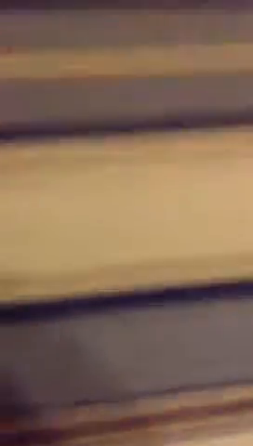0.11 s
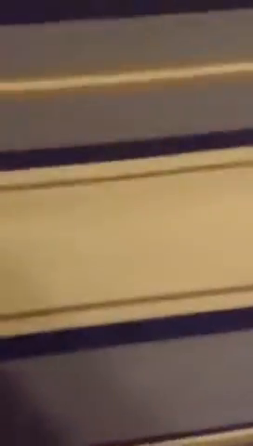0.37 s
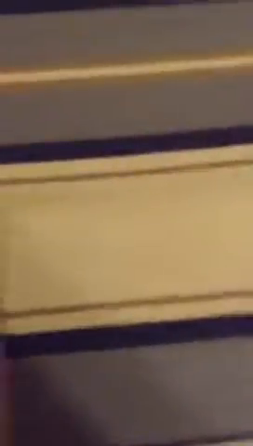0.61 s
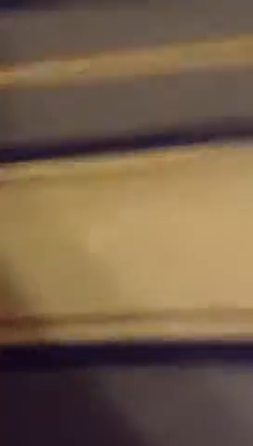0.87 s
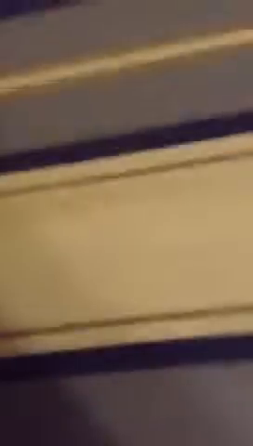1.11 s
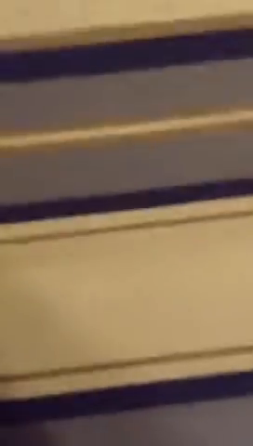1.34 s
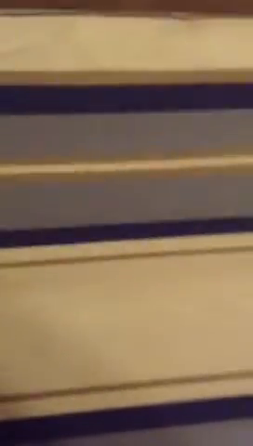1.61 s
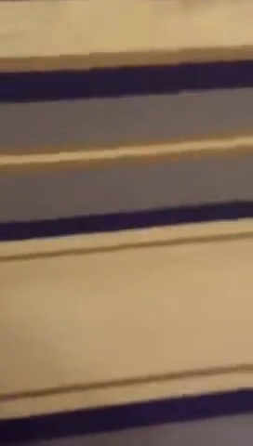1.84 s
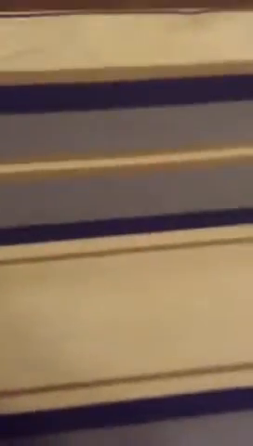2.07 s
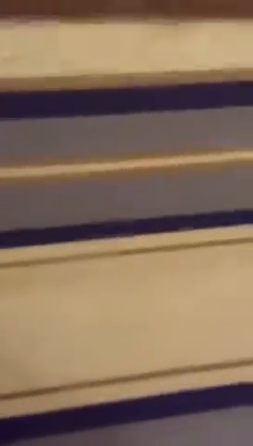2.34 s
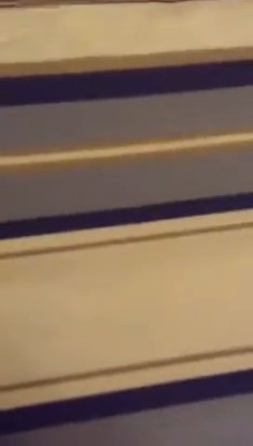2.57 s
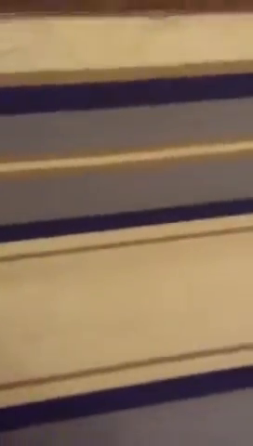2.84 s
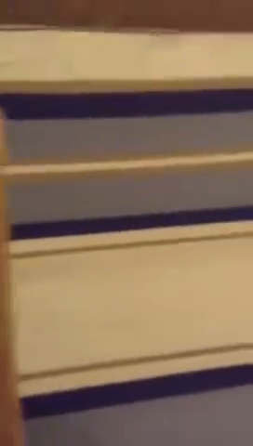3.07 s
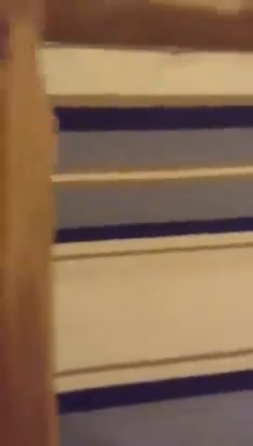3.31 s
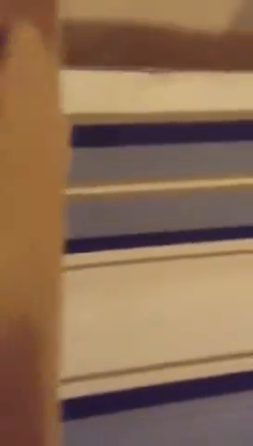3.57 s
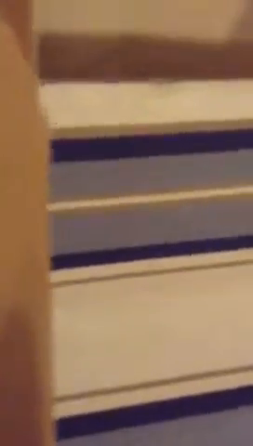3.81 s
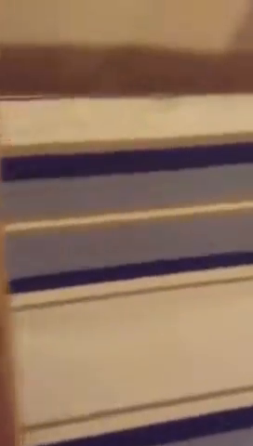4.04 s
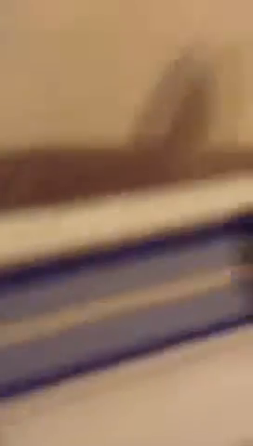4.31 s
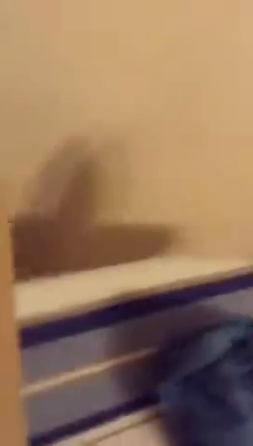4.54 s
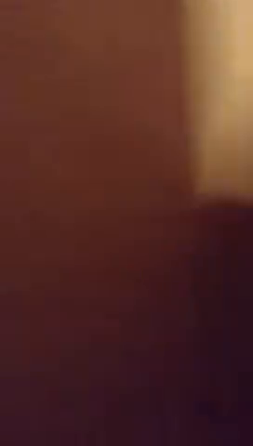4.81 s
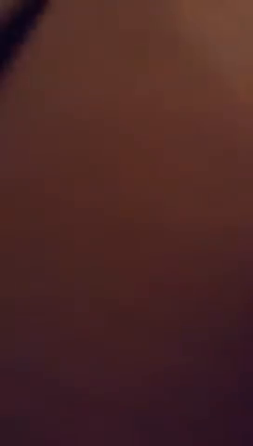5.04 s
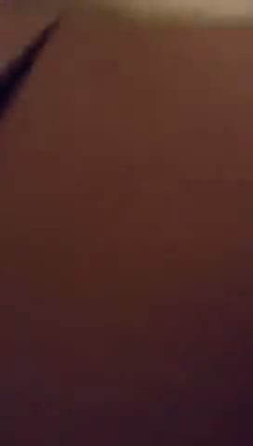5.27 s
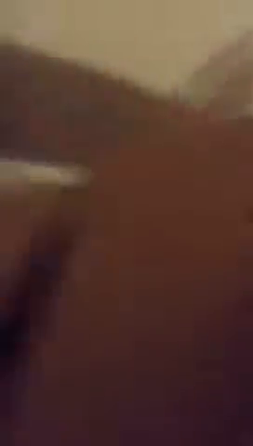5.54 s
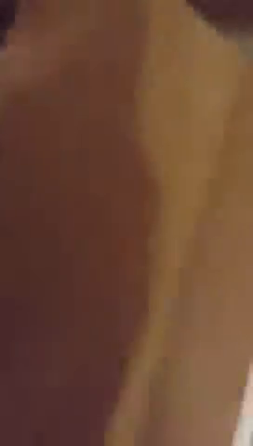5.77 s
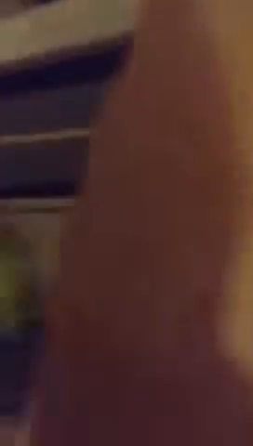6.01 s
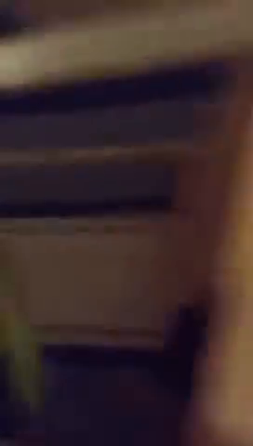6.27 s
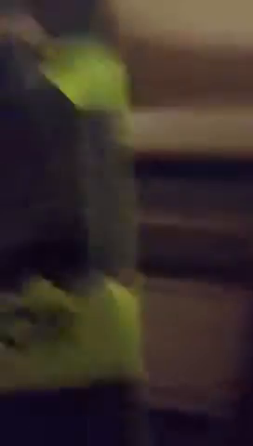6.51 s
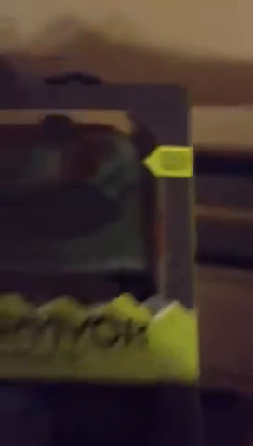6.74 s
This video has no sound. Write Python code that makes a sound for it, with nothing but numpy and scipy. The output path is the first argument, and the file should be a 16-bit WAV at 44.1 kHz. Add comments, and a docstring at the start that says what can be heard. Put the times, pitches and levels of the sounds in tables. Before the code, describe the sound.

Very close to a phone microphone in a small room, hands scrape and turn a hollow cardboard package with plastic film. A bright tear around one second ends in a hard snap, another strong crack follows near two, then lighter crinkles and taps. Busy hollow knocks and snaps return after four seconds, with a brief creak, before thumps near six give way to quiet.

```python
"""Hands rub, tear and turn a hollow cardboard box with plastic wrap, right by a phone microphone in a small room.
Rubbing is a dense stream of tiny slips: the walls rumble, the card scrapes and the film hisses.
A long tear sings in a narrow band; creases snap, seams rip and a bent flap creaks, all as close by.
Fingers knock the box, which rings in its low modes, and low jolts come through the hands.
Behind them lie the short reflections of the room, its quiet air and the microphone's own noise."""
import sys
import numpy as np
from scipy import signal
from scipy.io import wavfile
from scipy.ndimage import uniform_filter1d

SR = 44100
rng = np.random.default_rng(int(sys.argv[2]) if len(sys.argv) > 2 else 0)


def transcribe(signal):
    """Save signal, clipped to [-1, 1], as a 16-bit WAV file at the path in sys.argv[1]."""
    frames = np.atleast_2d(signal).T
    limited = np.clip(frames, -1, 1)
    pcm = np.round(limited * 32767).astype(np.int16)
    wavfile.write(sys.argv[1], SR, pcm)


def level_to_linear(level):
    """Convert decibel levels to linear amplitude factors, elementwise."""
    exponent = np.asarray(level, float) / 20
    return 10 ** exponent


N = 303408  # samples

# strokes of the hand, close to the microphone: start_s, length_s, effort_db,
# wall_pressure_db and film_share_db (both relative to the effort)
STROKES = [(0.013, 0.13, -39, -16.5, 1.4), (0.06, 0.01, -42.5, 7.5, -11), (0.098, 0.019, -30, -10, -10.8),
           (0.11, 0.25, -40, -10, 4), (0.297, 0.015, -38, -1, 2), (0.349, 0.064, -40.5, -8.5, 5),
           (0.5, 0.075, -48, -7, -0.5), (0.575, 0.066, -39.5, -6, 4.5), (0.631, 0.019, -33, -5, 1),
           (0.751, 0.045, -43.5, 6.5, -3.8), (0.822, 0.065, -31.5, 1.3, -0.5), (0.855, 0.17, -28, -10, 3),
           (1.054, 0.017, -23, -16.2, 8), (1.047, 0.066, -23.5, -4.5, -4.5),
           (1.174, 0.1, -50.5, -2.4, -3.3), (1.226, 0.26, -40, -11, -2.5), (1.323, 0.077, -37, -1, -20),
           (1.439, 0.0059, -33.5, 1, -4.5), (1.474, 0.12, -47.1, 6, -6), (1.546, 0.081, -39, -6.5, -2.5),
           (1.636, 0.092, -39.5, -9, -8.5), (1.792, 0.13, -39, -0.5, -8), (1.81, 0.004, -28.5, -13, -2.5),
           (1.861, 0.011, -32, 10.5, -3), (1.91, 0.29, -48, 0.4, -4.5), (1.921, 0.038, -46, 13, -8),
           (2.14, 0.24, -49.5, -1.5, 0.5), (2.288, 0.011, -44.0, 6.5, 5), (2.336, 0.035, -44, -17, 0.5),
           (2.464, 0.051, -47, -5, 1.5), (2.562, 0.034, -43, 6, -3.5), (2.633, 0.0035, -34, -10.1, 0.7),
           (2.638, 0.23, -50, -22.5, -1.5), (2.691, 0.015, -39.5, -4.5, -20), (2.854, 0.041, -46, 4, -13),
           (2.977, 0.075, -48, 0, 1.8), (3.032, 0.25, -48, 3.5, -1.9), (3.066, 0.0073, -39.5, 6, -12),
           (3.209, 0.046, -41, -2, -1), (3.31, 0.1, -48, -14, 4), (3.356, 0.18, -44, 4, 3),
           (3.45, 0.19, -49.5, 3.5, 6), (3.674, 0.13, -41, -6, -0.5), (3.716, 0.0086, -34, -0.5, -4),
           (3.827, 0.01, -28, -16, -16), (3.918, 0.092, -39.5, 0.5, -3.5), (4, 0.018, -43.5, -13.1, 8),
           (4.1, 0.15, -53.2, -23, 13), (4.108, 0.012, -38.5, 1.1, -16), (4.213, 0.16, -41, -1, 1.1),
           (4.27, 0.23, -40.5, -2, 0.5), (4.277, 0.06, -29.5, -3.2, -3.5), (4.484, 0.11, -37, 4.5, -2),
           (4.575, 0.15, -50.5, 9.5, 5.5), (4.663, 0.037, -57, 24.5, 16.5), (4.707, 0.017, -36, -10, 0.9),
           (4.735, 0.06, -41.5, -14, 9.5), (4.821, 0.0028, -39.5, 7, -1), (4.857, 0.074, -48, 2, 0.5),
           (4.981, 0.239, -41, -1.5, -5.5), (4.986, 0.0038, -40.5, 2, 8.5),
           (5.278, 0.015, -49.5, 5.5, -22.1), (5.323, 0.084, -52.5, 5.5, 6), (5.403, 0.21, -47, 4.5, 1.5),
           (5.441, 0.02, -46, -12, 4), (5.552, 0.22, -40, -3, -1.8), (5.572, 0.12, -36.5, -24, 1.5),
           (5.799, 0.015, -45, 11.5, 10), (5.857, 0.13, -44.5, 1, -4), (5.866, 0.0037, -32, -16, -5),
           (5.937, 0.022, -40, 10, 1), (6.029, 0.057, -52, -2, -5.7), (6.155, 0.1, -62.5, 1, -13),
           (6.165, 0.005, -57, 5, -5), (6.207, 0.005, -76, 29, -5.3), (6.546, 0.066, -64, -19, -7),
           (6.657, 0.14, -67.5, -16, -6), (6.698, 0.088, -63.5, -17, -5)]
STROKE_RISE_DB_S, CARD_FALL_DB_S, WALL_FALL_DB_S, FILM_FALL_DB_S = 702.5, 450.5, 302, 498.5


def rubbing():
    """Each stroke drives slips on the walls, the card and the film, over the steadier shifting of the hold."""
    start_s, length_s, effort_db, wall_db, film_db = np.transpose(STROKES)
    hold_db, bright = holding(column=1), holding(column=2)
    wall_rows = zip(start_s, length_s, effort_db + wall_db)
    card_rows = zip(start_s, length_s, effort_db)
    film_rows = zip(start_s, length_s, effort_db + film_db)
    wall_gain = swells(wall_rows, STROKE_RISE_DB_S, WALL_FALL_DB_S, hold_db - 7.5)
    card_gain = swells(card_rows, STROKE_RISE_DB_S, CARD_FALL_DB_S, hold_db)
    # a brighter film is also louder under the hold
    film_gain = swells(film_rows, STROKE_RISE_DB_S, FILM_FALL_DB_S, hold_db - 4 + 0.94 * bright)
    return wall_gain * wall_rumble() + card_gain * card_scrape() + film_gain * film_hiss(bright)


# the hands keep shifting on the box: time_s, effort_db, brightness_db_per_octave as the film turns,
# pitch_hz (resonance of the rubbed card)
HOLD = [(0, -42.5, 0, 2606), (.4, -43.5, -2, 3600), (.46, -53.5, 3, 2000), (0.621, -44, -3, 3160),
        (.8, -39.5, 4, 1857), (1.2, -49, 0.5, 2983), (1.4, -48, 1.5, 3086), (1.55, -48.5, 2, 1920),
        (1.75, -46, 2, 2500), (2.0, -51, -3, 2400), (2.43, -54, 5.5, 1700), (2.7, -50, 4, 1298),
        (3.3, -46.5, 7, 1288), (3.9, -50.5, 4, 1590), (4.2, -45.5, 3, 3500), (4.3, -41, 1.5, 1600),
        (4.6, -46, 6.5, 1290), (4.95, -51.5, -2, 1614), (5.1, -43, 1, 1687), (5.35, -49.5, -1, 2700),
        (5.5, -45.5, -9, 1600), (5.571, -46, -6, 2780), (5.75, -50, -3, 3590), (5.9, -60, 3.5, 1598),
        (6.02, -61, 0, 2200), (6.13, -65, -7, 2000), (6.3, -88, 1.5, 2990), (6.5, -82, -1, 3470),
        (6.651, -75, -10.5, 2673), (6.88, -68, -10, 3275)]


def holding(column):
    """One property of the hold, gliding from row to row as the hands shift."""
    table = np.array(HOLD)
    return np.interp(np.arange(N) / SR, table[:, 0], table[:, column])


# colour of the shaken walls: frequency_hz, level_db (per Hz, relative)
RUMBLE = [(82, -33), (140, -6.5), (183, -15.5), (264, 9.5), (303, -2.5), (356, -9.5), (519, -2.5),
          (642, -0.5), (1400, -21), (1820, -42.5), (3080, -120)]


def wall_rumble():
    """Slips shake the walls and their modes; the rumble's pitch glides between those of the spots knocked."""
    knocked = np.transpose(KNOCKS)

    def colour_db(hz, t):
        return read(RUMBLE, hz) + 7 * hump(hz, np.interp(t, knocked[0], knocked[2]), octaves=0.45)

    walls = coloured(slips(4000, spread_db=1.5, clump_db=1.5), colour_db, patchy_db=2)
    ringing = signal.oaconvolve(slips(2000, spread_db=1.5, clump_db=1.5), box_ring(spot_hz=400, reach=4))[:N]
    return evened(walls + 0.37 * evened(ringing))


# colour of the scraped card: frequency_hz, level_db (per Hz, relative)
SCRAPE = [(80, -60.5), (300, -4.5), (800, 0), (1300, -3), (2000, -3), (2800, -3), (3600, -6), (4300, -11),
          (7000, -16.5), (15000, -57.5)]


def card_scrape():
    """Dense slips scrape and sparse ones tick on the card, setting the box's modes ringing."""
    held = np.transpose(HOLD)

    def colour_db(hz, t):
        return read(SCRAPE, hz) + 6 * hump(hz, np.interp(t, held[0], held[3]), octaves=0.2)

    dense = slips(12000, spread_db=1.5, clump_db=1.5)
    ticks = slips(250, spread_db=2.5, clump_db=3)
    scrape = evened(dense) + 0.35 * evened(ticks)
    ringing = signal.oaconvolve(scrape, box_ring(spot_hz=2000, reach=11))[:N]
    return evened(coloured(scrape, colour_db, patchy_db=2.6) + 0.42 * evened(ringing))


# colour of the plastic film: frequency_hz, level_db (per Hz, relative)
HISS = [(500, -63), (2500, -6), (5000, 2.5), (6500, 1.5), (8500, 2.5), (11000, -2), (13500, -1),
        (15500, -7.5)]


def film_hiss(bright):
    """Very dense slips and a few ticks hiss on the film, tilting brighter or duller around 9 kHz as it turns."""
    def colour_db(hz, t):
        tilt = np.interp(t * SR, np.arange(N), bright)
        return read(HISS, hz) + tilt * np.log2(np.maximum(hz, 5000) / 9000)

    dense = slips(20000, spread_db=1.5, clump_db=1.2)
    ticks = slips(200, spread_db=2.5, clump_db=3)
    return coloured(evened(dense) + 0.22 * evened(ticks), colour_db, patchy_db=2.5)


# the long tear, close by: time_s, level_db, pitch_hz (centre of its band)
TEAR = [(0.8, -45, 3400), (0.836, -33.5, 3300), (0.926, -24.5, 3770), (0.948, -29.5, 3670),
        (1.014, -22, 3770), (1.018, -25.5, 3720), (1.066, -29.5, 3115), (1.1, -37, 3275)]


def tear():
    """Fibres part at a steady pace and the slit between the flaps picks out one gliding band."""
    s, level_db, slit_hz = np.transpose(TEAR)

    def slit_db(hz, t):
        return -40 * (1 - hump(hz, np.interp(t, s, slit_hz), octaves=0.55))

    fibres = coloured(slips(6600, spread_db=-1.5, clump_db=2), slit_db, patchy_db=0)
    return level_to_linear(np.interp(np.arange(N) / SR, s, level_db, left=-120, right=-120)) * fibres


# snaps of fibre and film, close by: start_s, level_db (dull part), treble_db, pitch_hz
SNAPS = [(.0464, -29.5, -27, 3160), (0.1457, -29.5, -30.5, 1940), (0.1846, -36, -45, 1280),
         (.233, -25.5, -29, 3140), (.6888, -33.5, -41, 3970), (.7133, -30.5, -56.5, 1710),
         (.7692, -33, -36.5, 1870), (0.8534, -22.5, -26.5, 1920), (1.0798, -3.5, -10, 2150),
         (1.1112, -11.5, -12, 1950), (1.1842, -31.5, -47, 1010), (1.251, -21.5, -30.5, 1680),
         (1.35, -30.5, -40, 1800), (1.4321, -16, -27.5, 2100), (1.476, -29, -39, 1820),
         (1.546, -23, -35, 1800), (1.605, -25, -38, 1860), (1.6463, -33.5, -34.5, 1850),
         (1.8524, -4, -12.5, 1900), (1.9738, -31, -51, 1120), (2.139, -28.5, -47, 1110),
         (2.224, -50, -31.5, 1850), (2.2637, -50, -36.5, 2510), (2.2877, -34.5, -32.5, 2340),
         (2.4067, -40, -47, 1530), (2.4527, -40.5, -44, 1830), (2.577, -37.5, -36, 1380),
         (2.6033, -38, -31.5, 1250), (2.6338, -22, -26, 5030), (2.688, -30.5, -46, 1460),
         (2.7677, -31.5, -43, 1330), (2.8087, -36.5, -51, 1360), (2.8527, -33, -48, 1300),
         (2.884, -34.5, -44.5, 1080), (3.0693, -27.5, -28, 1200), (3.0919, -28, -44.5, 1380),
         (3.1737, -33, -35, 1200), (3.247, -32, -41.5, 1120), (3.352, -40, -30.5, 1800),
         (3.385, -36, -30.5, 3360), (3.485, -34.5, -35, 1830), (3.592, -36, -34.5, 4400),
         (3.6106, -35, -34.5, 2030), (3.6955, -29, -36.5, 2460), (3.7102, -19.5, -28, 1520),
         (3.729, -32.5, -25.5, 1340), (3.8367, -23.5, -45, 2540), (3.922, -27, -35, 1560),
         (3.9648, -27, -39, 2000), (3.998, -34, -34.5, 1540), (4.0158, -19, -21, 1790),
         (4.0945, -37, -46, 4320), (4.1144, -24, -43.5, 1180), (4.2803, -10, -35, 1980),
         (4.324, -9, -32, 1520), (4.388, -25.5, -37.5, 1290), (4.4895, -6.5, -10.5, 1540),
         (4.5348, -23, -32.5, 1410), (4.5684, -23, -36, 2180), (4.6445, -29, -29, 1280),
         (4.663, -43, -26.5, 1250), (4.816, -26, -33.5, 1170), (4.983, -25.5, -27, 3920),
         (5.044, -30, -32.5, 1220), (5.0897, -25, -29, 1540), (5.1178, -30, -36, 1720),
         (5.1974, -29, -32.5, 1660), (5.2687, -33, -40, 1700), (5.3286, -36, -37, 2750),
         (5.398, -33, -44, 1020), (5.4759, -29, -47, 1000), (5.5884, -27, -34.5, 2760),
         (5.7502, -24.5, -32, 1090), (5.7662, -33, -25.5, 1070), (5.798, -38, -27, 3100),
         (5.8082, -28.5, -31, 4120), (5.9207, -28.5, -36, 1080), (5.9487, -30, -28, 2770),
         (6.157, -34.5, -57, 2040), (6.6897, -52, -63, 1116), (6.7433, -50, -66, 1650)]
SNAP_RISE_S, SOFT_DECAY_S, HARD_DECAY_S, SOFT_DB = 0.0014, 0.0039, 0.0014, -34.5


def snaps():
    """Each snap builds up as the crease gives, then dies in a few milliseconds, faster the harder it is."""
    out, t = np.zeros(N), np.arange(SR // 10) / SR
    noise = rng.standard_normal((len(SNAPS), 2, len(t)))
    for (s, level_db, treble_db, hz), cracks in zip(SNAPS, noise):
        softness = min(max(level_db, treble_db) / SOFT_DB, 1)
        decay_s = HARD_DECAY_S + (SOFT_DECAY_S - HARD_DECAY_S) * softness
        burst = np.minimum(t / SNAP_RISE_S, 1) * np.exp(-np.maximum(t - SNAP_RISE_S, 0) / decay_s)
        add(out, s, burst * crackle(cracks, level_db, treble_db, hz))
    return out


# short rips of glued card, close by: start_s, length_s, level_db (dull part), treble_db, pitch_hz
RIPS = [(0.1117, 0.0045, -22, -28.5, 2070), (0.817, 0.042, -32.5, -39, 1900),
        (1.061, 0.015, -30, -25.5, 2200), (1.103, 0.016, -30, -31.5, 2000),
        (1.429, 0.015, -30.5, -37, 1960), (1.798, 0.015, -22.5, -34, 2400),
        (2.6213, 0.0046, -23, -25.5, 1880), (3.664, 0.011, -31, -50, 1340),
        (3.718, 0.0057, -17.5, -22.5, 1420), (3.806, 0.033, -35.5, -45, 2510),
        (4.276, 0.011, -24.5, -31, 1880), (4.568, 0.011, -26.5, -37, 2170), (4.71, 0.021, -35, -35.5, 1120),
        (5.694, 0.018, -29, -34.5, 1760), (5.856, 0.015, -27, -36.5, 1510)]


def rips():
    """A seam gives way: crackle swells fast, holds unevenly while the hand pulls and stops short."""
    out, t = np.zeros(N), np.arange(SR // 10) / SR
    noise = rng.standard_normal((len(RIPS), 3, len(t)))
    for (s, length_s, *colour), (*cracks, jerks) in zip(RIPS, noise):
        pull = np.minimum(t / 0.0016, 1) * np.exp(-np.maximum(t - length_s, 0) / 0.0023)
        uneven = level_to_linear(1.9 * evened(uniform_filter1d(jerks, size=90)))
        add(out, s, pull * uneven * crackle(cracks, *colour))
    return out


def crackle(cracks, level_db, treble_db, hz):
    """Breaking fibres: a dull part around a pitch and a bright spit."""
    dull, spit = cracks
    broad = band(band(dull, 600, 3000), 380, 7200)
    pitched = band(dull, hz * 0.9, hz * 1.05)
    body = evened(broad) + 1.1 * evened(pitched)
    return level_to_linear(level_db) * evened(body) + level_to_linear(treble_db) * evened(band(spit, 4200, 14000))


# knocks on the box, close by: start_s, level_db, pitch_hz (of the struck spot),
# ring_db (relative to the push), push_s (its decay, at least 2 ms)
KNOCKS = [(0.111, -19.5, 554, -3.5, 0.0093), (0.145, -19, 400, -24, 0.0049), (0.186, -21, 560, -18, 0.0088),
          (0.414, -35, 660, -20, 0.011), (0.558, -33.5, 738, -10, 0.018), (0.638, -25, 345, -12.5, 0.019),
          (0.768, -37, 356, 5.5, 0.011), (0.82, -22.5, 530, -1.5, 0.013), (0.85, -29.5, 670, -0.5, 0.0047),
          (1.02, -31, 355, 6, 0.011), (1.078, -14.5, 780, 0.5, 0.0052), (1.115, -17, 424, -8, 0.0059),
          (1.182, -18.5, 278, -30, 0.0037), (1.245, -27.5, 712, -1.5, 0.015), (1.325, -37, 316, -5, 0.013),
          (1.448, -25.5, 547, -10.5, 0.006), (1.544, -16.5, 677, -11.5, 0.0049),
          (1.606, -29.5, 400, -1.5, 0.0053), (1.8, -27, 167, -3, 0.01), (1.851, -10, 341, -3.5, 0.011),
          (2.063, -27.5, 348, -5, 0.011), (2.096, -36, 171, -18, 0.02), (2.139, -21, 202, -7.5, 0.0059),
          (2.242, -27, 584, -12, 0.012), (2.288, -19, 424, -9.5, 0.0049), (2.38, -29, 348, -23, 0.0093),
          (2.46, -38.5, 280, -1.5, 0.0067), (2.577, -26, 280, -11, 0.0086),
          (2.619, -22.5, 338, -29, 0.0068), (2.69, -43, 260, 0, 0.011), (2.852, -34.5, 593, -0.5, 0.0091),
          (2.884, -38, 577, -5, 0.011), (2.961, -31, 384, -14, 0.011), (2.994, -28.5, 258, -3, 0.0072),
          (3.065, -23, 262, -7, 0.0094), (3.088, -23, 265, -3.5, 0.0073), (3.239, -34.5, 367, 3, 0.032),
          (3.388, -37, 202, 5, 0.014), (3.489, -20.5, 270, -6, 0.0028), (3.607, -32, 149, 2, 0.0087),
          (3.667, -23, 730, -35, 0.012), (3.695, -22, 502, -21, 0.0067), (3.734, -36, 285, -16, 0.0072),
          (3.8, -29.5, 702, -0.5, 0.02), (3.833, -23.5, 450, -30, 0.0067), (3.918, -40, 192, 0, 0.016),
          (3.965, -18, 280, -27, 0.0058), (4.016, -27, 285, -23, 0.01), (4.073, -33, 312, -3.5, 0.008),
          (4.117, -26, 339, -11, 0.015), (4.207, -33, 573, -18.5, 0.0092), (4.279, -16, 625, -5.5, 0.0063),
          (4.325, -15, 388, -3.5, 0.006), (4.391, -12, 300, -35.5, 0.007),
          (4.488, -24.5, 568, -32.5, 0.013), (4.538, -18, 400, -20, 0.0053),
          (4.573, -20.5, 561, -2.5, 0.016), (4.583, -33, 426, -39.5, 0.0071), (4.645, -31, 388, -4, 0.024),
          (4.701, -22, 378, -31, 0.0082), (4.713, -11, 261, -20, 0.0074), (4.818, -13.5, 423, -29, 0.011),
          (4.988, -29, 670, -0.5, 0.011), (4.998, -26, 132, -7, 0.0039), (5.046, -23.5, 403, -21, 0.0059),
          (5.092, -27.5, 625, -5, 0.0086), (5.113, -27.5, 252, -7, 0.012), (5.196, -27, 596, -10, 0.0085),
          (5.23, -23.5, 395, -17, 0.0045), (5.285, -28.5, 747, -6.5, 0.0057),
          (5.325, -26, 517, -11.5, 0.0034), (5.396, -24, 885, -31, 0.0083), (5.46, -35, 830, 3, 0.017),
          (5.498, -22, 870, -16, 0.0054), (5.699, -24, 680, -0.5, 0.0095), (5.776, -35, 147, -19, 0.0087),
          (5.811, -26, 400, -6.5, 0.019), (5.86, -28.5, 280, 1.5, 0.0092), (5.904, -10.5, 598, -8, 0.01),
          (5.924, -19, 660, -12, 0.0097), (5.936, -8.5, 273, -12.5, 0.0049),
          (6.159, -23, 400, -8.5, 0.0066)]


def knocks():
    """A finger pushes the wall in, a dying swing at the spot's pitch, and the box rings with it."""
    out, t = np.zeros(N), np.arange(SR // 2) / SR
    for s, level_db, hz, ring_db, push_s in KNOCKS:
        push = np.sin(2 * np.pi * hz * t) * np.exp(-t / max(push_s, 0.002))
        onset = np.minimum(t / 0.0019, 1)
        add(out, s, level_to_linear(level_db) * onset * (push + level_to_linear(ring_db) * box_ring(hz, reach=6.5)))
    return out


# modes of the hollow box: pitch_hz, level_db (before the struck spot's weighting), t60_s
BOX = [(162, -15.5, 0.04), (208, -21.5, 0.12), (280, -6, 0.31), (366, -1, 0.16), (424, 2.5, 0.057),
       (496.5, 2.5, 0.054), (647.3, 4, 0.064), (789, 2, 0.041), (962, 1.5, 0.029), (1336, -11, 0.092),
       (1500, -10, 0.036), (1760, -6.5, 0.048), (1950, -7, 0.047), (2100, -11, .12), (2400, -18, 0.14),
       (2770, -8, 0.08)]


def box_ring(spot_hz, reach):
    """Decaying box modes; each loses reach dB per octave away from the struck spot's pitch."""
    t = np.arange(SR // 2) / SR
    ring = np.zeros(len(t))
    for hz, level_db, t60_s in BOX:
        fading_db = level_db - reach * abs(np.log2(hz / spot_hz)) - 60 * t / t60_s
        ring += level_to_linear(fading_db) * np.sin(2 * np.pi * hz * t)
    return ring


# a bent flap creaks, close by: time_s, level_db, slips_per_s
CREAK = [(4.645, -22.5, 150), (4.666, -28, 149), (4.718, -24.5, 138), (4.74, -49, 110)]
# partials of the creak: multiple, level_db (relative)
PARTIALS = [(1, -3.5), (2, 4), (3, 9), (4, -28)]


def creak():
    """Nearly regular slips of a fold; the hollow box keeps only their lowest partials."""
    s, level_db, per_s = np.transpose(CREAK)
    t = np.arange(N) / SR
    waver = 1 + 0.0307 * evened(uniform_filter1d(rng.standard_normal(N), size=400))
    turns = np.cumsum(np.interp(t, s, per_s) * waver) / SR
    fold = sum(level_to_linear(db) * np.sin(2 * np.pi * multiple * turns) for multiple, db in PARTIALS)
    gain = np.interp(t, s, level_to_linear(level_db), left=0, right=0)
    return uniform_filter1d(gain, size=150) * evened(fold)


# low jolts carried through the hands: start_s, level_db
JOLTS = [(0.276, -64), (0.551, -51), (0.843, -49.5), (1.084, -29), (1.334, -59), (1.451, -42), (1.539, -46),
         (1.601, -40), (1.801, -32.5), (1.85, -34), (1.93, -52), (2.053, -45), (2.138, -53), (2.244, -38),
         (2.375, -45), (2.577, -46), (2.717, -44), (2.966, -54), (3.077, -33), (3.227, -41), (3.392, -44.5),
         (3.485, -41), (3.605, -50), (3.713, -51), (3.912, -44.5), (4.121, -49.5), (4.277, -32),
         (4.385, -37.5), (4.488, -36.5), (4.573, -36.5), (4.641, -33), (4.709, -33.5), (4.81, -40),
         (4.99, -34), (5.09, -40), (5.404, -41), (5.558, -57), (5.707, -46), (5.775, -28), (5.903, -37)]
JOLT_RISE_DB_S, JOLT_HOLD_S, JOLT_FALL_DB_S = 899, 0.0083, 349.5


def jolts():
    """Uneven low pushes: slips narrowed to about 100-210 Hz, over a faint share of the hold's effort."""
    pushes = band(band(slips(300, spread_db=2, clump_db=2), 110, 200), 100, 210)
    rows = [(s, JOLT_HOLD_S, level_db) for s, level_db in JOLTS]
    return swells(rows, JOLT_RISE_DB_S, JOLT_FALL_DB_S, holding(column=1) - 20) * evened(pushes)


# decay of the small room: frequency_hz, t60_s
ROOM = [(200, 0.22), (1000, 0.2), (4000, 0.38), (12000, 0.42)]


def room(x):
    """Sparse reflections of random sign, each band dying at its own speed."""
    taps = np.zeros(SR // 2)
    at = np.arange(200, SR // 2 - 20, 20)
    taps[at + rng.integers(0, 20, len(at))] = rng.choice([-1., 1.], len(at))
    hz, t, z = signal.stft(taps, SR, nperseg=256)
    tail = signal.istft(z * level_to_linear(-60 * t / read(ROOM, hz)[:, None]), SR, nperseg=256)[1]
    return signal.oaconvolve(x, tail / np.linalg.norm(tail))[:N]


# colour of the air and microphone noise: frequency_hz, level_db (per Hz, relative)
ROOM_TONE = [(18, -57), (30, -21), (208, -5.5), (341, 1), (591, -9.5), (709, -2), (945, -13.5),
             (1080, -13.5), (2690, -15.5), (13300, -22), (15500, -36)]


def room_tone():
    """The quiet air of the room and the microphone's own noise: coloured noise at -73 dB."""
    return level_to_linear(-73) * coloured(rng.standard_normal(N), lambda hz, t: read(ROOM_TONE, hz), patchy_db=1.5)


def slips(per_s, spread_db, clump_db):
    """Stick-slip: tiny clicks of uneven size that come in clumps of a few milliseconds."""
    chance, size = rng.random(N), rng.exponential(1, N)
    sign, clump = rng.standard_normal(N), rng.standard_normal(N)
    clump = evened(uniform_filter1d(uniform_filter1d(clump, size=300), size=300))
    return sign * (chance < per_s / SR) * level_to_linear(spread_db * np.minimum(size, 4) + clump_db * clump)


def coloured(x, colour_db, patchy_db):
    """Gives each short moment its spectrum, with wandering patches; every moment's gain has rms 1."""
    hz, t, z = signal.stft(evened(x), SR, nperseg=512, noverlap=384)
    patches = rng.standard_normal((len(t), len(hz))).T
    patches = evened(uniform_filter1d(uniform_filter1d(patches, size=8, axis=0), size=9, axis=1))
    gain = level_to_linear(colour_db(hz[:, None], t) + patchy_db * patches) * np.ones(z.shape)
    gain = gain / np.sqrt((gain ** 2).mean(0))
    return signal.istft(z * gain, SR, nperseg=512, noverlap=384)[1][:N]


def swells(rows, rise_db_s, fall_db_s, under_db):
    """Gain over time: each (start, length, dB) rises up to its start, holds and falls; powers add to under_db."""
    t, power = np.arange(0, N, 64) / SR, level_to_linear(2 * under_db[::64])
    for s, length_s, level_db in rows:
        rise_db = rise_db_s * np.minimum(t - s, 0)
        fall_db = fall_db_s * np.maximum(t - s - length_s, 0)
        power = power + level_to_linear(2 * (level_db + rise_db - fall_db))
    return np.interp(np.arange(N) / SR, t, np.sqrt(power))


def hump(hz, centre_hz, octaves):
    """A resonance: a bell of height 1 on a log frequency axis."""
    return np.exp(-(np.log2((hz + 1) / centre_hz) / octaves) ** 2)


def evened(x):
    """Scales to rms 1."""
    return x / np.sqrt(np.mean(x ** 2) + 1e-20)


def read(points, hz):
    """Reads a table of (Hz, value) along log frequency."""
    f, value = np.transpose(points)
    return np.interp(np.log(hz + 1), np.log(f + 1), value)


def add(mix, s, sound):
    """Lays a sound into the mix at s seconds."""
    part = mix[round(s * SR):][:len(sound)]
    part += sound[:len(part)]


def band(x, lo_hz, hi_hz):
    """Band-pass filter."""
    return signal.sosfilt(signal.butter(2, [lo_hz, min(hi_hz, SR / 2.1)], "band", fs=SR, output="sos"), x)


def scene():
    """All sources at the microphone; only the snaps, rips, knocks and creak excite the room's reflections."""
    blows = snaps() + rips() + knocks() + creak()
    return (rubbing() + tear() + jolts() + blows + level_to_linear(-17) * room(blows) + room_tone())[None]


def top_cut(x):
    """Nothing passes above the cut-off."""
    return signal.sosfilt(signal.butter(12, 16430, fs=SR, output="sos"), x)


def record(dry):
    """The deep bass is thinned, a sharp low-pass at 15.45 kHz cuts the top treble, the highest peaks are rounded."""
    thin = signal.sosfilt(signal.butter(6, 95, "high", fs=SR, output="sos"), dry)
    lowpass = signal.firwin(511, 15450, window=("kaiser", 8), fs=SR)
    thin = signal.oaconvolve(thin, lowpass[None], "same")
    ceiling = 0.74  # of full scale
    rounded = thin / (1 + abs(thin / ceiling) ** 4) ** 0.25
    return top_cut(rounded)


dry = scene()
out = record(dry)
transcribe(out)
```